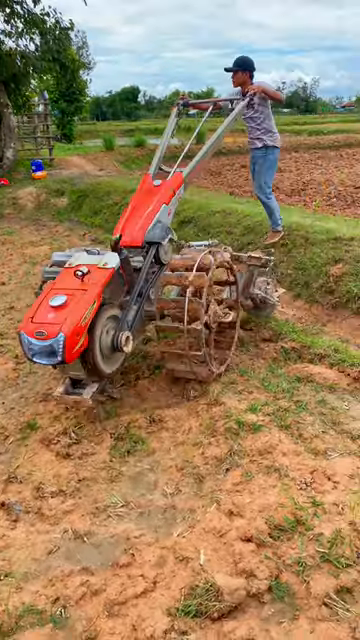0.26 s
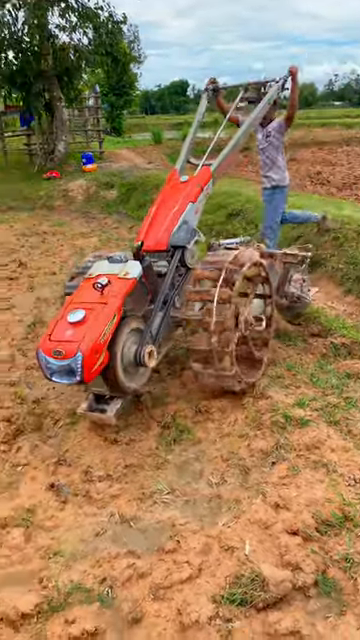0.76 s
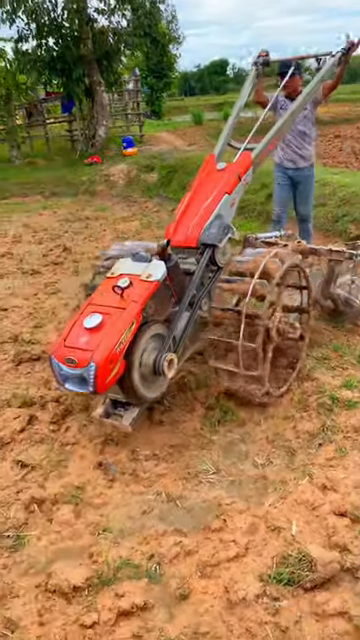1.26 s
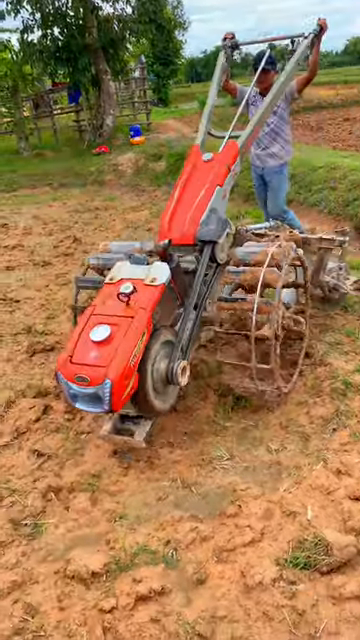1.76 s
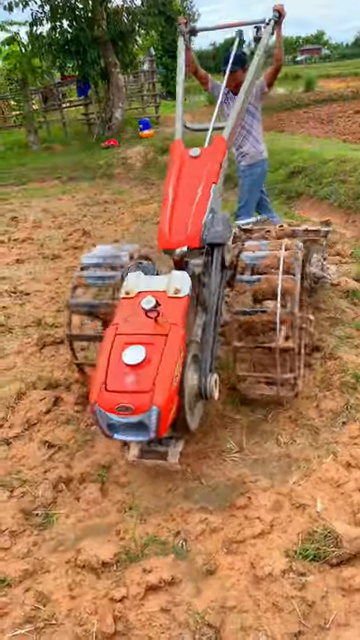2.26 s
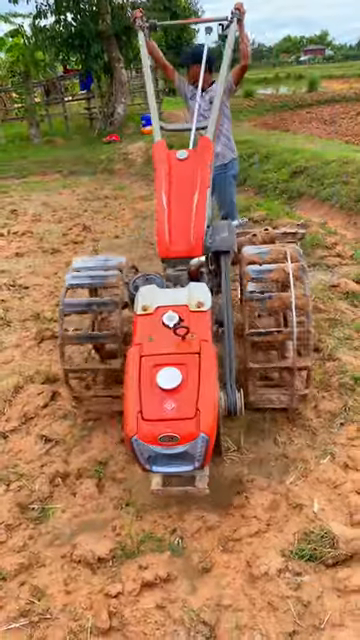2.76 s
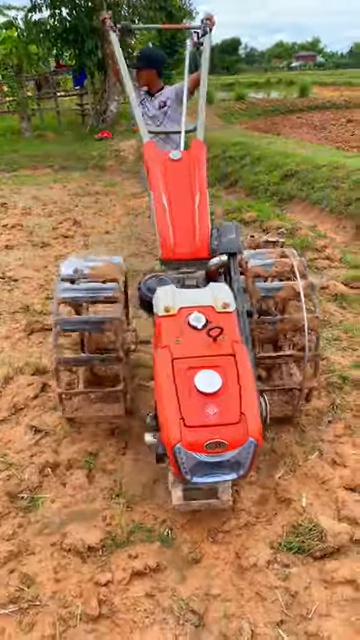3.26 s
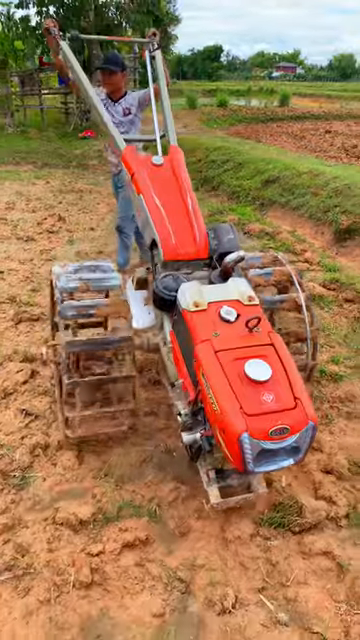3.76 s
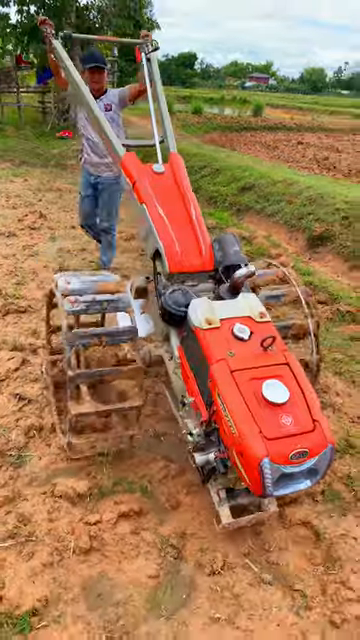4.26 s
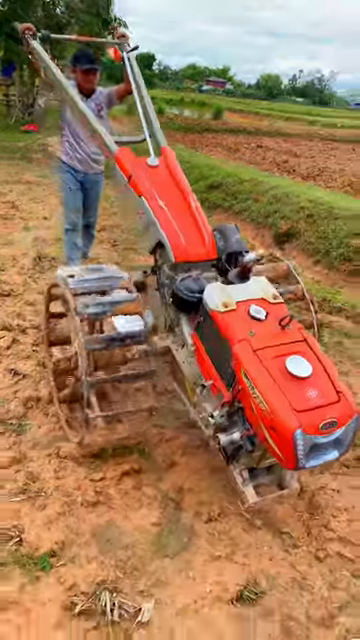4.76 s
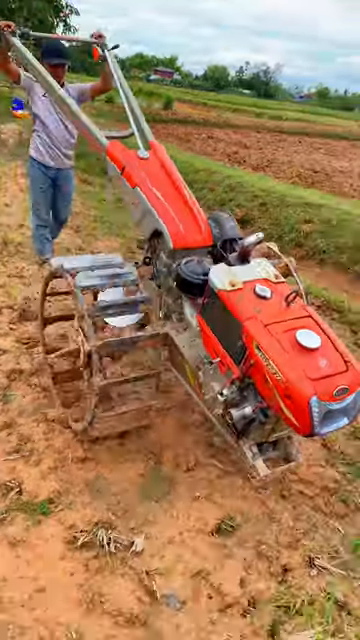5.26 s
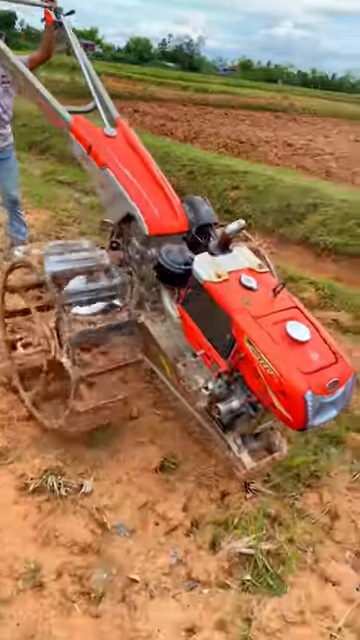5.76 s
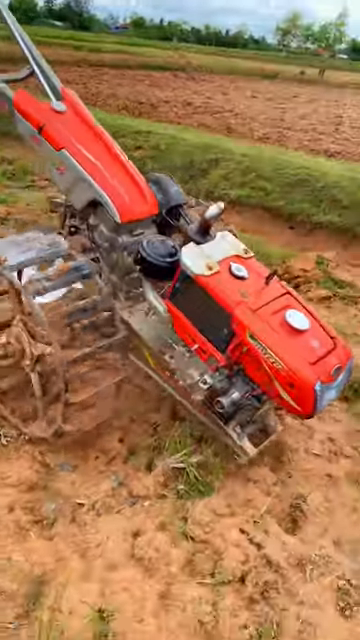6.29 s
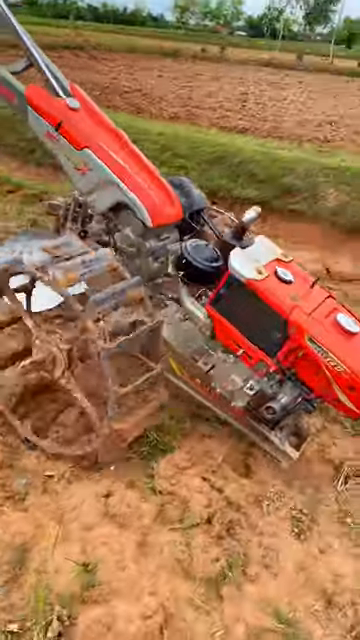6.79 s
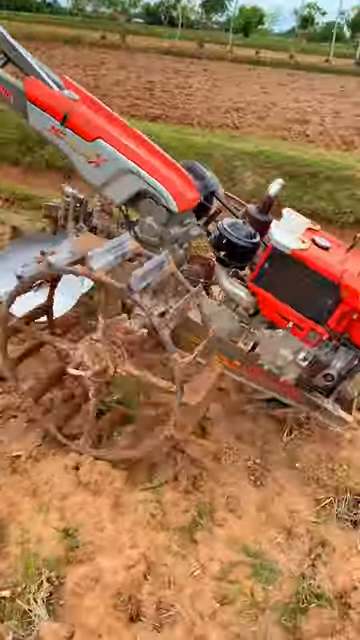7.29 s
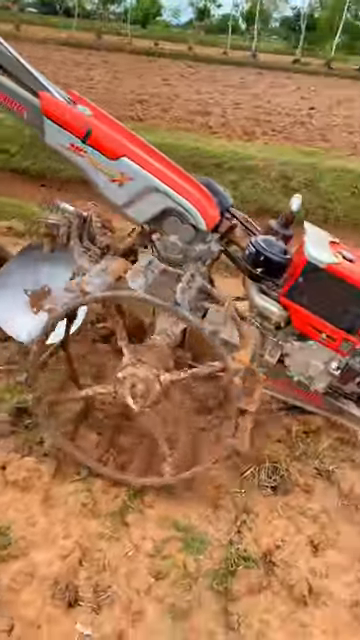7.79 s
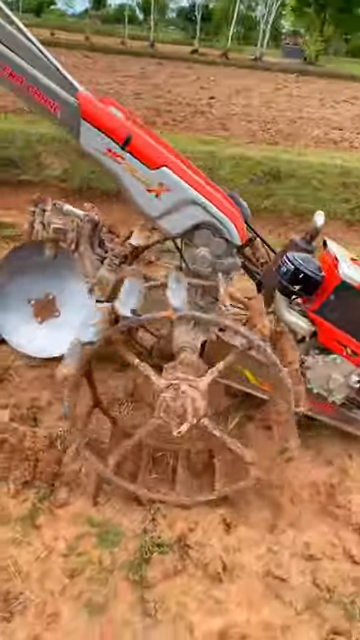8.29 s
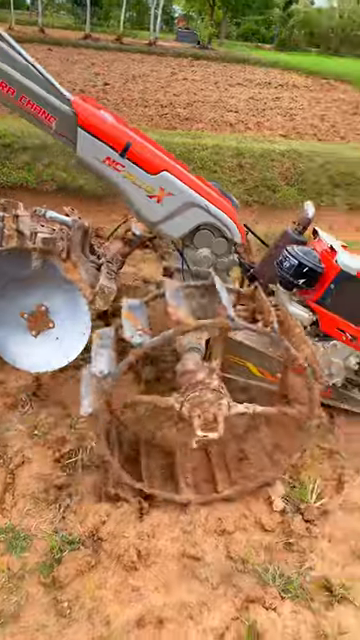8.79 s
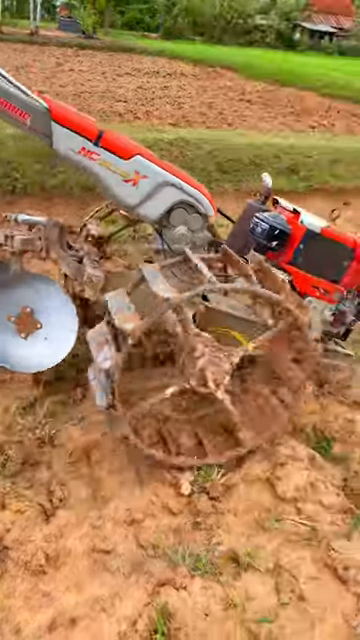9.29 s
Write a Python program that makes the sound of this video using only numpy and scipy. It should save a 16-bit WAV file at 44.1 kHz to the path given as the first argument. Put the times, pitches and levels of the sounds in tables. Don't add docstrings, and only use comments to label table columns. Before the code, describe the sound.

Slow knocking diesel idle with gear clatter and wheel thuds over soil, revving mid-way into harder blasts and a rapid steady chug.

```python
import sys
import numpy as np
from scipy import signal
from scipy.fft import rfft, irfft, next_fast_len
from scipy.io import wavfile
from scipy.ndimage import uniform_filter1d

SR = 44100
rng = np.random.default_rng(int(sys.argv[2]) if len(sys.argv) > 2 else 0)


def attenuation_scalar(level_db):
    decades = np.asarray(level_db, float) / 20
    return 10 ** decades


def transcribe(u):
    v = np.clip(np.atleast_2d(u).T, -1, 1)
    q = np.round(v * 32767).astype(np.int16)
    wavfile.write(sys.argv[1], SR, q)


N = 420713

# time_s, firings_per_s
SPEED = [(0, 6.7), (.52, 6.94), (1.33, 7.02), (3.85, 6.82), (3.89, 6.71), (4.79, 6.8), (5.29, 7.76),
         (5.52, 8.81), (6.04, 11.01), (6.6, 11.7), (6.85, 12.35), (7.53, 12.81), (8.57, 12.64),
         (9.54, 12.58)]
FIRST_FIRING_S = 0.0185
# time_s, knock_db
LOAD = [(0, -16.5), (.3, -18), (1.0, -16), (1.7, -15), (2.4, -16.5), (3.0, -14.5), (4.5, -15), (4.85, -8.5),
        (5.5, -12.5), (6.05, -9), (6.4, -15.5), (6.6, -8), (7.0, -12.5), (7.3, -11), (7.7, -15.5),
        (8.3, -17), (8.6, -16), (9.54, -17)]
# time_s, injector_side_db, pipe_side_db
FACING = [(0, -24.5, -17), (1.3, -25, -12.5), (2.3, -20.5, -12), (3.0, -24, -8.5), (3.8, -21.5, -19),
          (5.6, -24.5, -12.5), (6.0, -26, 0.5), (6.35, -36, -2), (6.7, -32, -4.5), (7.1, -32.5, 0),
          (7.6, -52, 2), (8.2, -62, 2.5), (9.54, -42, -0.5)]
# freq_hz, width_hz, level_db
BLOCK_MODES = [(717, 200, -8), (911, 45, -8.5), (1373, 89, -8), (1574, 175, -2), (1688, 36, -3),
               (1872, 176, -1.5), (2110, 230, -13.5), (2890, 55, -14.5), (3160, 280, -12),
               (4800, 1500, -15), (7000, 2700, -10.5), (11300, 7100, -15.5)]
# freq_hz, width_hz, level_db
CASE_MODES = [(731, 200, 0), (924, 107, -2), (1132, 365, 3.5), (1410, 236, 1), (1807, 286, 1),
              (2240, 230, -4), (2546, 530, 2), (3040, 400, -40), (4720, 210, -23), (4900, 1800, -3.5)]
# time_s, hiss_db, thump_db
BLOWDOWN = [
    (0, -27.5, -29.5),
    (4.5, -21, -24),
    (4.9, -15, -20),
    (5.45, -12, -16.5),
    (5.85, -5, -12),
    (6.38, -29, -17.5),
    (6.47, -22, -36),
    (7.5, -73, -75),
    (9.54, -103, -42),
]
# cycle_share, pitch_hz, rise_s, t60_s, level_db
THUMP_RINGS = [
    (0.341, 80, 0.0072, 0.062, 15.5),
]
# cycle_share, pitch_hz, rise_s, t60_s, level_db
POP_RINGS = [
    (.525, 345, .001, .029, 8),
    (.586, 132, .002, .074, 5),
]
# cycle_share, pitch_hz, rise_s, t60_s, level_db
PIPE_RINGS = [
    (.709, 101, .001, .051, 9),
    (.778, 150.6, .007, .4, 5),
    (.774, 286, .002, .34, -3),
    (1.154, 286, .004, .34, 1),
    (1.283, 192, .001, .33, -3),
    (1.343, 248, .004, .048, 10),
    (1.346, 81.5, .002, .17, 6),
]
# cycle_share, level_db, t60_s
TICKS = [
    (.095, -5, 0.038),
    (.19, -4, 0.048),
    (0.252, -16.5, 0.059),
]
# freq_hz, width_hz, level_db
INJECTOR_MODES = [(6060, 330, -10), (7140, 3100, -6), (9500, 1600, -3), (10280, 770, 0), (11500, 320, -1.5),
                  (14100, 3000, 4)]
# cycle_share, level_db, t60_s
VALVES = [
    (0.498, -31.5, 0.031),
    (0.638, -29.5, 0.0091),
    (0.789, -33.5, 0.027),
]
# freq_hz, width_hz, level_db
SEAT_MODES = [(810, 680, 13), (1390, 3300, 5.5), (4030, 2500, -6), (7400, 3300, 2), (9660, 9900, 4),
              (14500, 3000, -2)]
# freq_hz, width_hz, level_db
JET_MODES = [(770, 670, -5.5), (2040, 2000, -4), (4230, 10000, -21), (8600, 2700, -12), (11300, 1100, -18),
             (14500, 2500, -22)]
# freq_hz, density_db
AIR_SPECTRUM = [(1500, 19), (3000, 41), (5500, 38), (7500, -12), (10000, -31), (13000, -15), (15500, -36)]
# time_s, effort_db
GROUND = [(0.0, -28), (0.45, -36.5), (0.98, -37.5), (1.22, -27), (1.43, -39), (2.02, -28.5), (2.39, -36),
          (3.32, -33.5), (3.74, -38), (4.22, -28.5), (4.43, -32.5), (4.7, -34.5), (5.58, -32.5),
          (5.92, -26), (7.31, -24.5), (8.72, -27.5), (9.03, -24.5), (9.54, -25.5)]
# freq_hz, density_db
RUMBLE_SPECTRUM = [(20, -32), (40, -2.5), (70, 1), (110, -0.5), (170, -5), (260, -14), (500, -37)]
# freq_hz, density_db
CRUNCH_SPECTRUM = [(120, -37), (250, 2), (400, 1), (650, -10), (1000, -23), (2000, -29)]
# start_s, peak_db, pitch_hz
THUDS = [(0.15, -12, 147), (0.641, -15.5, 116), (1.81, -7.5, 67), (2.009, -18.5, 211), (2.152, -8, 64.5),
         (2.178, -8.5, 70), (2.302, -13, 156), (3.086, -19, 94.5), (3.269, -16.5, 210), (3.323, -20, 85.6),
         (4.808, -13, 82.4), (6.334, -11, 154), (6.521, -13, 139), (6.631, -6.5, 245), (6.673, -10, 221),
         (6.65, -9, 270)]
# start_s, peak_db
CLANKS = [(0.149, -32), (0.19, -39), (1.771, -29), (2.156, -27), (3.044, -20), (3.198, -17), (3.223, -23),
          (3.265, -16), (3.301, -30), (3.332, -20.5), (6.629, -25), (6.68, -32)]
# freq_hz, width_hz, level_db
PLATE_MODES = [(400, 125, -1.5), (750, 370, 9), (970, 490, -8), (1070, 220, -34)]
# freq_hz, lead_half_turns
PORT_LEAD = [(0, 0), (1900, 0), (3200, .28), (5000, .2), (7250, 1), (13600, 3), (16800, 4)]
# freq_hz, tilt_db
PORT_TILT = [(60, 0), (300, -.7), (700, 2), (1300, 2.5), (2400, -1), (4400, 0), (15000, 0)]
# freq_hz, correlation
PORT_LIKENESS = [(40, .93), (200, .95), (600, .86), (1400, .93), (3200, .8), (5500, .9), (7250, .995),
                 (15000, .99)]
# freq_hz, gain_db
MICROPHONE = [(18, -28), (30, -16), (45, 1.5), (3000, 1.5), (6000, 1), (9000, 1), (12000, -2), (15000, -12)]

USUAL_EFFORT_DB = -33
GEAR_DB, GEAR_SHARE = -26, 0.15


def combustion():
    s, knock_db = moments(0, jitter_s=0.0005), per_cycle(LOAD, 1, spread_db=0.6)
    blow = bursts(s, knock_db + 1.0, BLOCK_MODES, t60_s=0.033, scatter_db=1.9, rise_s=0.0013)
    rattle = bursts(s + 0.002, knock_db - 17.0, CASE_MODES, t60_s=0.29, scatter_db=0.5)
    resonant_per_s, span_per_s = 12.6, 0.29
    top_per_s = np.maximum.accumulate(curve(SPEED, 1, s))
    detuning = np.minimum(np.abs(top_per_s - resonant_per_s) / span_per_s, 3)
    settled = np.clip(s - 7.5, 0, 1)
    cover_db = knock_db - 8.5 * detuning - 30 * settled
    cover_modes = [(983, 260, 0.0077)]  # freq_hz, width_hz, level_db
    buzz = bursts(s, cover_db, cover_modes, t60_s=0.051, scatter_db=1.0)
    return blow + rattle + buzz


def pipes():
    side_db = curve(FACING, 2, moments(0))
    thump_db = per_cycle(BLOWDOWN, 2, spread_db=1.0)
    pop_db = -18.5 + 1.93 * side_db
    ring_db = -24 + side_db
    out = np.zeros(N)
    for drive_db, rings in ((thump_db, THUMP_RINGS), (pop_db, POP_RINGS), (ring_db, PIPE_RINGS)):
        for share, hz, rise_s, t60_s, db in rings:
            pulses = train(moments(share), attenuation_scalar(drive_db + db))
            out += signal.oaconvolve(pulses, ring(hz, rise_s, t60_s))[:N]
    return out


def valve_gear():
    out = np.zeros(N)
    tick_db = per_cycle(FACING, 1, spread_db=1.8)
    for share, db, t60_s in TICKS:
        out += bursts(moments(share, jitter_s=0.0027), tick_db + db, INJECTOR_MODES, t60_s, scatter_db=1.8)
    for share, db, t60_s in VALVES:
        s = moments(share, jitter_s=0.00047)
        landing_db = db + 0.4 * (worked(GEAR_DB, GEAR_SHARE, s) + 28)
        out += bursts(s, landing_db, SEAT_MODES, t60_s, scatter_db=2.5, rise_s=0.002)
    s = moments(0.255, jitter_s=0.001)
    jet = bursts(s, curve(BLOWDOWN, 1, s), JET_MODES, t60_s=0.07, scatter_db=1.5, rise_s=0.003)
    return out + jet


def gears():
    size_db = 2.6 * np.minimum(rng.exponential(1, N), 3.5)
    struck = rng.random(N) < 4500 / SR
    clicks = attenuation_scalar(size_db) * struck * rng.standard_normal(N)
    case = np.zeros(N)
    for hz, width_hz, db in CASE_MODES:
        panel_clicks = np.roll(clicks, rng.integers(N))
        panel = resonate(resonate(panel_clicks, hz, 1.03 * width_hz), hz, 1.03 * width_hz)
        case += attenuation_scalar(db) * panel
    gear_db = worked(GEAR_DB, GEAR_SHARE)
    fan_db = 18 * np.log10(0.19 * curve(SPEED, 1))
    air = lumpy(AIR_SPECTRUM, patchy_db=5.0, gusty_db=4.5, size=256)
    return attenuation_scalar(gear_db - 6.5) * evened(case) + attenuation_scalar(0.41 * gear_db + fan_db - 34.5) * air


def wheels():
    t = np.arange(N) / SR
    late_drop_db = 3.5 * np.clip(t - 6.6, 0, 1)
    rumble_db = np.minimum(worked(-29.5, 1), -27) - late_drop_db
    out = attenuation_scalar(rumble_db) * lumpy(RUMBLE_SPECTRUM, patchy_db=0.5, gusty_db=5.5, size=1024)
    fit_strength = np.clip(6.2 - t, 0.2, 1)
    fits = uniform_filter1d(rng.standard_normal(N), size=2500)
    fits = evened(uniform_filter1d(fits, size=2500))
    swing_db = 4 * fit_strength * np.clip(fits, -2.5, 1)
    crunch_db = worked(-31, 1.04) - late_drop_db + swing_db - 2.5
    out += attenuation_scalar(crunch_db) * lumpy(CRUNCH_SPECTRUM, patchy_db=3, gusty_db=2.5, size=512)
    for s, db, hz in THUDS:
        body = ring(hz, rise_s=0.0051, t60_s=0.059)
        contact = 1.05 * ring(4.26 * hz, rise_s=0.00081, t60_s=0.012)
        add(out, s, attenuation_scalar(db + 4.5) * (body + contact))
    s, db = np.transpose(CLANKS)
    return out + bursts(s, db - 9.5, PLATE_MODES, t60_s=0.23, scatter_db=6.5)


def moments(share, jitter_s=0.0):
    t = np.arange(N) / SR
    turns = np.cumsum(curve(SPEED, 1)) / SR
    turns = turns - np.interp(FIRST_FIRING_S, t, turns)
    s = np.interp(np.arange(int(turns[-1]) + 1), turns, t)
    return s + share / curve(SPEED, 1, s) + jitter_s * rng.standard_normal(len(s))


def per_cycle(rows, column, spread_db):
    s = moments(0)
    return curve(rows, column, s) + spread_db * rng.standard_normal(len(s))


def worked(level_db, share, t=None):
    return level_db + share * (curve(GROUND, 1, t) - USUAL_EFFORT_DB)


def bursts(s, db, modes, t60_s, scatter_db, rise_s=0.0012):
    t = np.arange(int(0.14 * SR)) / SR
    shape = attenuation_scalar(-60 * t / t60_s) * (1 - np.exp(-t / rise_s))
    blows, out = 0, np.zeros(N)
    for hz, width_hz, mode_db in modes:
        noise = shape * rng.standard_normal((len(s), len(t)))
        mode = resonate(resonate(noise, hz, width_hz), hz, 3 * width_hz)
        mode *= np.linalg.norm(shape) / np.linalg.norm(mode, axis=1, keepdims=True)
        blow_db = db + mode_db + scatter_db * rng.standard_normal(len(s))
        blows = blows + mode * attenuation_scalar(blow_db)[:, None]
    for at_s, blow in zip(s, blows):
        add(out, at_s, blow)
    return out


def resonate(x, hz, width_hz):
    r = np.exp(-np.pi * width_hz / SR)
    pole = r * np.exp(2j * np.pi * hz / SR)
    return np.sqrt(2 * (1 - r ** 2)) * signal.lfilter([1], [1, -pole], x + 1e-18).real


def ring(hz, rise_s, t60_s):
    t = np.arange(int(0.4 * SR)) / SR
    return attenuation_scalar(-60 * t / t60_s) * (1 - np.exp(-t / rise_s)) ** 2 * np.sin(2 * np.pi * hz * t)


def train(s, gain):
    at = np.round(s * SR).astype(int)
    inside = (at >= 0) & (at < N)
    return np.bincount(at[inside], gain[inside], N)


def lumpy(spectrum, patchy_db, gusty_db, size):
    frames, hz = 4 * N // size + 5, np.fft.rfftfreq(size, 1 / SR)
    a, b, patches = rng.standard_normal((frames, len(hz), 3)).T
    patches = uniform_filter1d(patches, size=5, axis=0)
    patches = evened(uniform_filter1d(patches, size=5, axis=1))
    gusts = evened(uniform_filter1d(rng.standard_normal(frames), size=3))
    level_db = read(spectrum, hz)[:, None] + patchy_db * patches + gusty_db * gusts
    z = (a + 1j * b) * attenuation_scalar(level_db)
    return evened(signal.istft(z, nperseg=size, noverlap=3 * size // 4)[1][:N])


def evened(x):
    return x / np.sqrt(np.mean(x ** 2) + 1e-20)


def read(points, hz):
    f, value = np.transpose(points)
    return np.interp(np.log(hz + 1), np.log(f + 1), value)


def curve(rows, column, t=None):
    rows = np.array(rows)
    return np.interp(np.arange(N) / SR if t is None else t, rows[:, 0], rows[:, column])


def add(mix, s, sound):
    part = mix[max(round(s * SR), 0):][:len(sound)]
    part += sound[:len(part)]


def scene():
    machine = combustion() + pipes() + valve_gear() + gears() + wheels()
    hz, _, direct = signal.stft(machine, SR, nperseg=512, noverlap=384)
    drift = uniform_filter1d(rng.standard_normal((*direct.shape, 2)), size=6, axis=1)
    scattered = direct * (drift[..., 0] + 1j * drift[..., 1]) * np.sqrt(3)
    angle = np.arccos(read(PORT_LIKENESS, hz))[:, None] / 2
    lead_half_turns = np.interp(hz, *np.transpose(PORT_LEAD))
    port = (attenuation_scalar(read(PORT_TILT, hz) / 2) * np.exp(0.5j * np.pi * lead_half_turns))[:, None]
    left = (np.cos(angle) * direct + 1.55 * np.sin(angle) * scattered) * port
    right = (np.cos(angle) * direct - 1.9 * np.sin(angle) * scattered) / port
    return signal.istft(np.array([left, right]), SR, nperseg=512, noverlap=384)[1][:, :N]


def joint_stereo(x, under_db, faint_db, sudden_db):
    mid_side = np.array([x[0] + x[1], x[0] - x[1]]) / 2
    hz, _, z = signal.stft(mid_side, SR, nperseg=1024, noverlap=768)
    power = uniform_filter1d(abs(z) ** 2, size=4, axis=2)
    power_db = 10 * np.log10(uniform_filter1d(power, size=16, axis=1) + 1e-20)
    treble_db = 10 * np.log10((abs(z[:, hz > 8000]) ** 2).sum((0, 1)) + 1e-20)
    sudden = treble_db - np.roll(treble_db, 3) > sudden_db
    steady = uniform_filter1d(1.0 * sudden, size=4) < 0.1
    masked = power_db < power_db[::-1] - under_db
    faint = power_db < np.median(power_db, axis=2, keepdims=True) + faint_db
    weak = masked | faint & (hz > 14300)[:, None]
    muted = weak & steady & (hz > 4500)[:, None]
    mid, side = signal.istft(z * ~muted, SR, nperseg=1024, noverlap=768)[1][:, :N]
    return np.array([mid + side, mid - side])


def roll_off(x):
    return signal.sosfilt(signal.butter(12, 17090, fs=SR, output="sos"), x)


def record(dry):
    size = next_fast_len(N)
    hz = np.fft.rfftfreq(size, 1 / SR)
    coloured = irfft(rfft(dry, size) * attenuation_scalar(read(MICROPHONE, hz)), size)[:, :N]
    heard = 1.2 * np.tanh(coloured / 1.2)
    joined = joint_stereo(heard, under_db=4.5, faint_db=-0.5, sudden_db=9.5)
    mix = irfft(rfft(joined, size) * (hz < 15950), size)[:, :N]
    return roll_off(mix)


dry = scene()
out = record(dry)
transcribe(out)
```